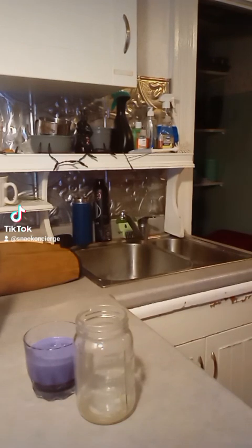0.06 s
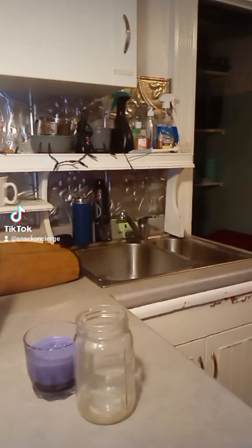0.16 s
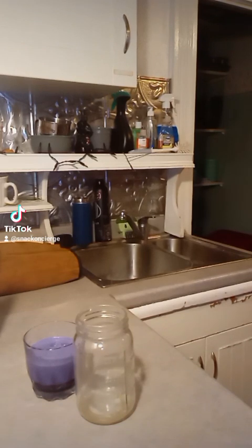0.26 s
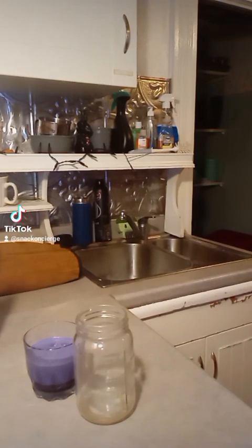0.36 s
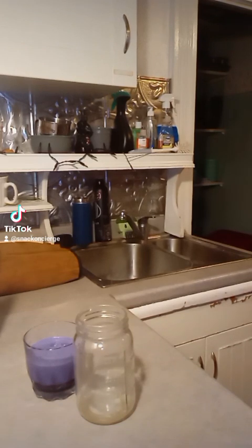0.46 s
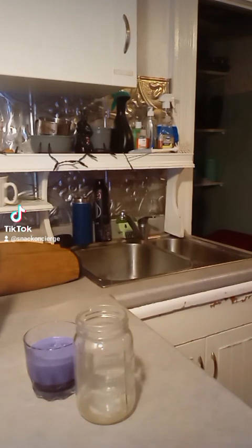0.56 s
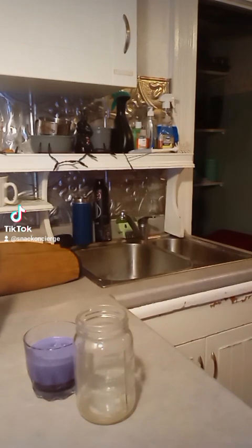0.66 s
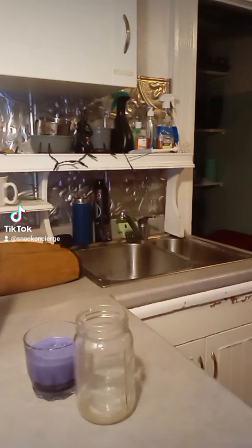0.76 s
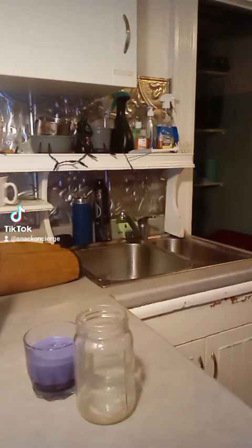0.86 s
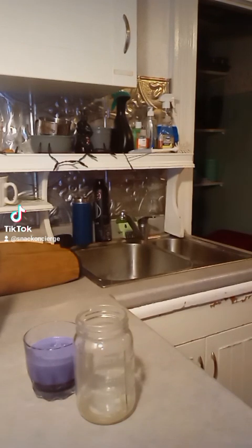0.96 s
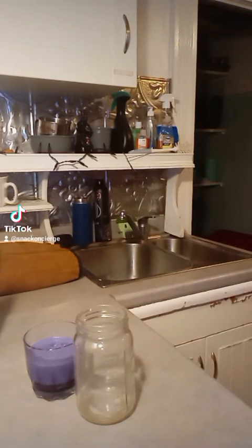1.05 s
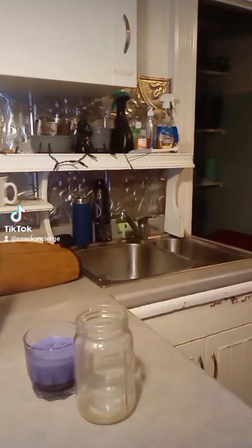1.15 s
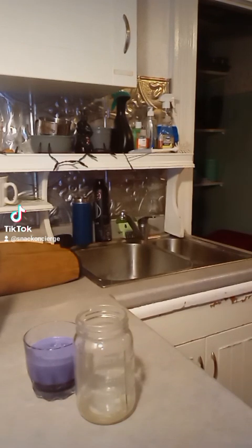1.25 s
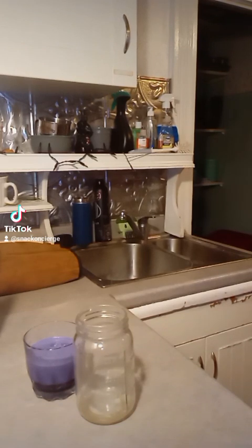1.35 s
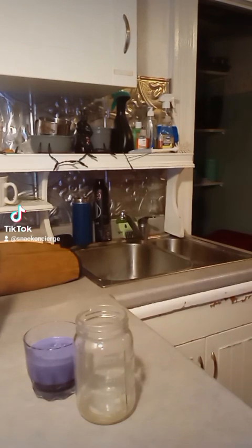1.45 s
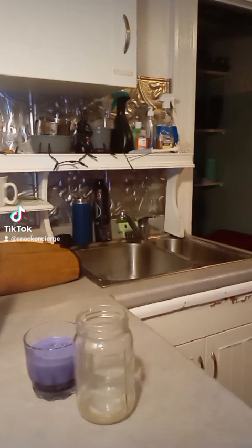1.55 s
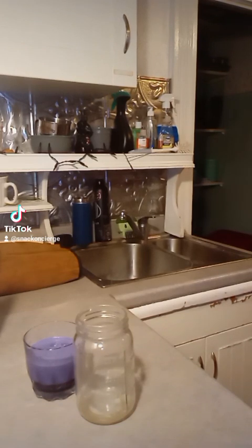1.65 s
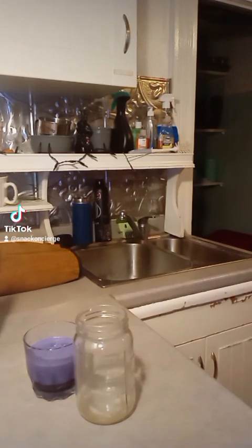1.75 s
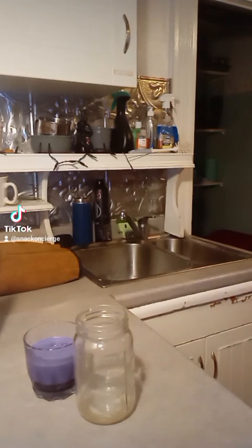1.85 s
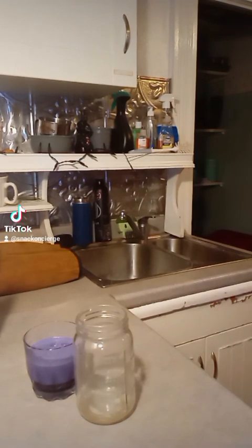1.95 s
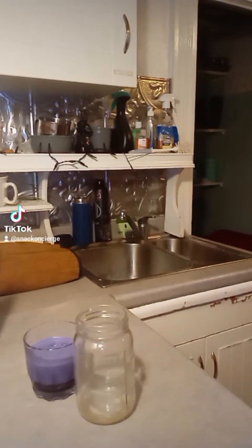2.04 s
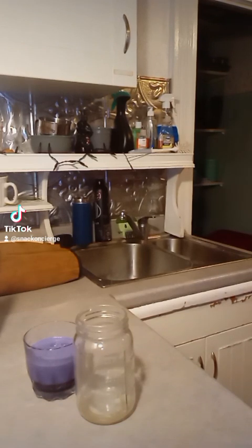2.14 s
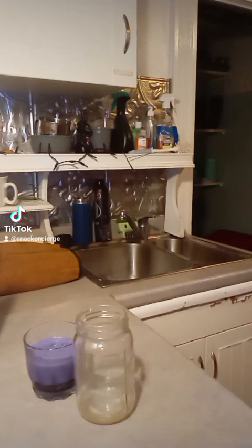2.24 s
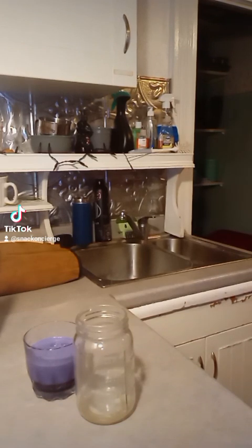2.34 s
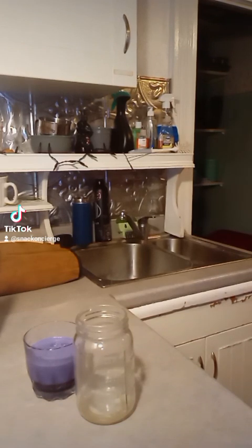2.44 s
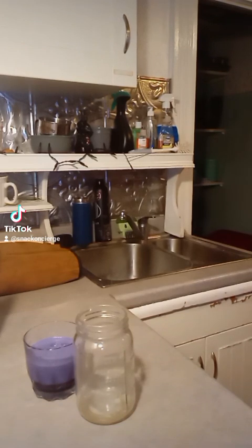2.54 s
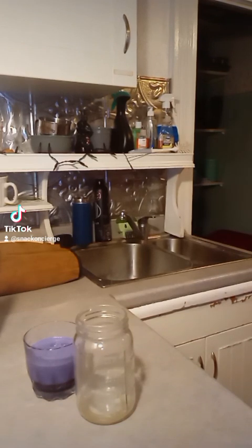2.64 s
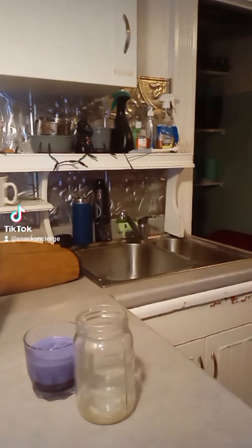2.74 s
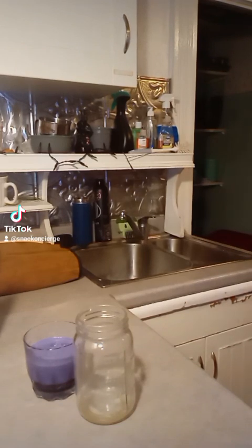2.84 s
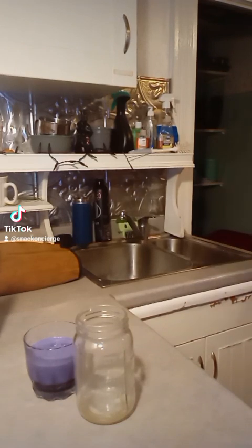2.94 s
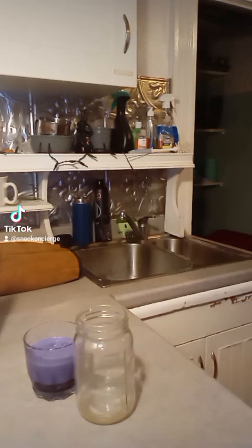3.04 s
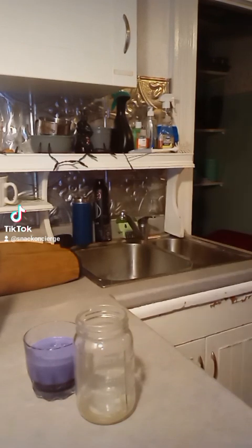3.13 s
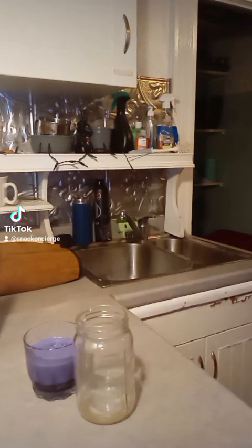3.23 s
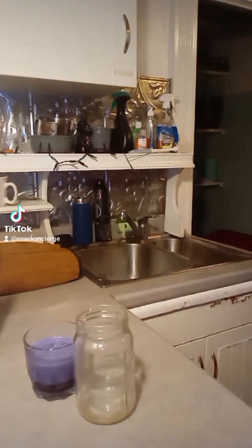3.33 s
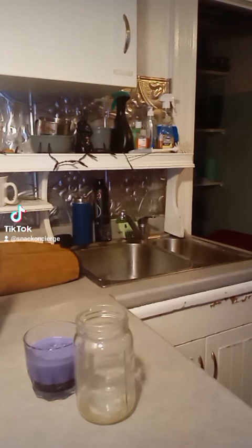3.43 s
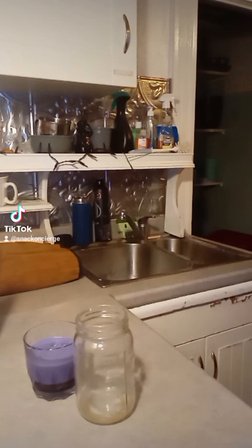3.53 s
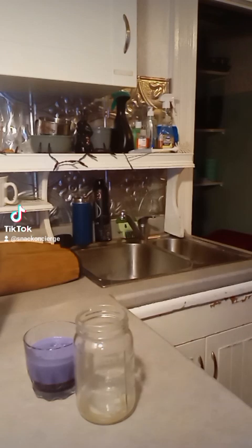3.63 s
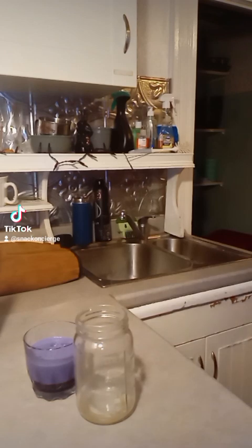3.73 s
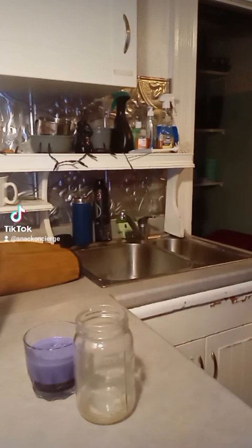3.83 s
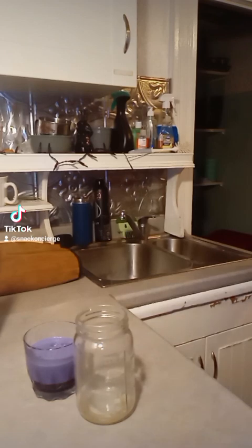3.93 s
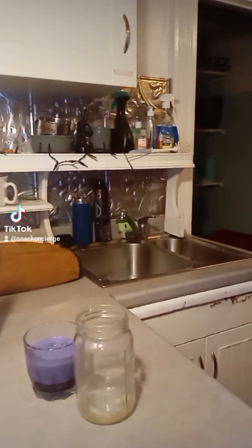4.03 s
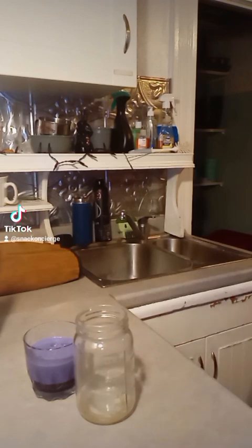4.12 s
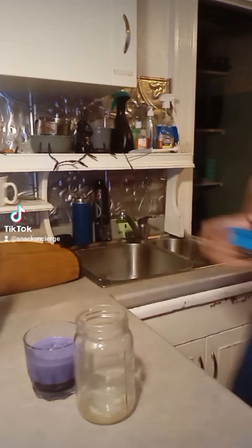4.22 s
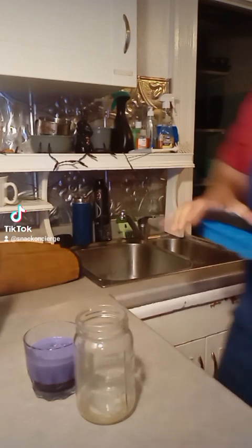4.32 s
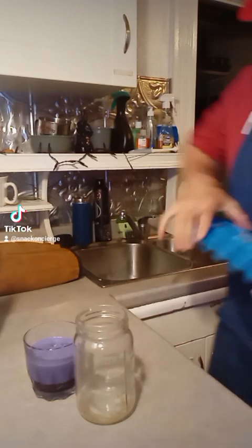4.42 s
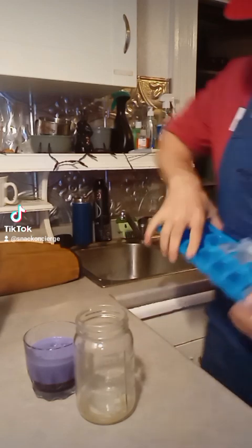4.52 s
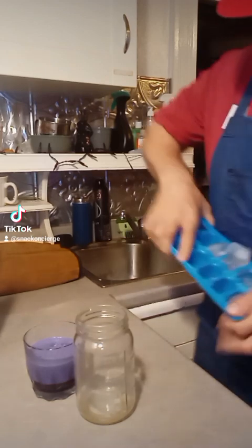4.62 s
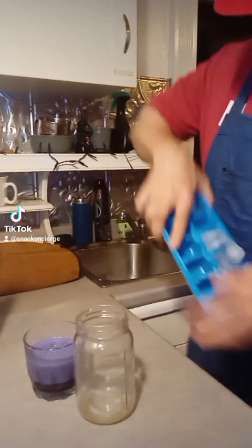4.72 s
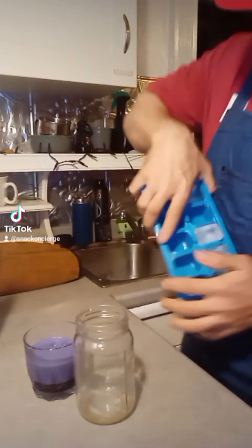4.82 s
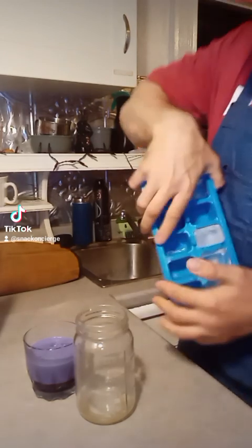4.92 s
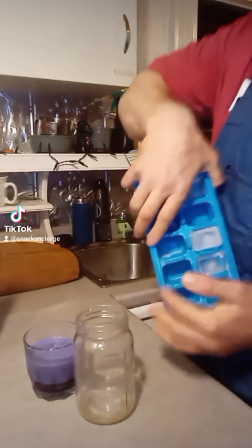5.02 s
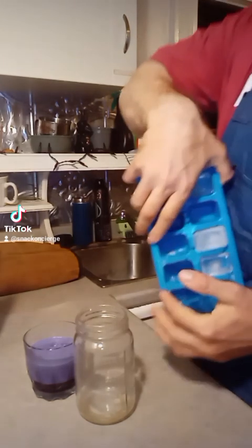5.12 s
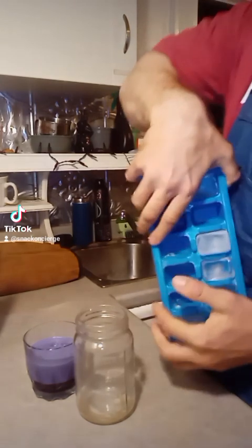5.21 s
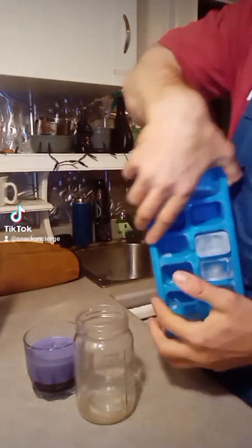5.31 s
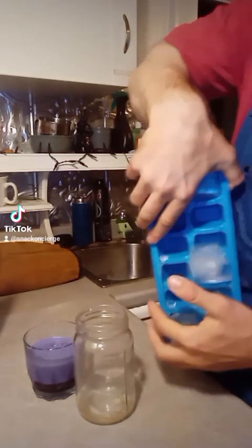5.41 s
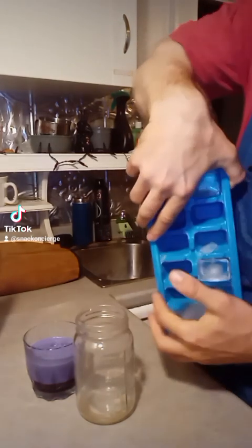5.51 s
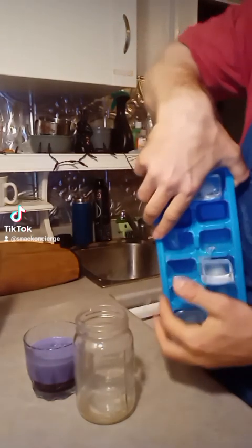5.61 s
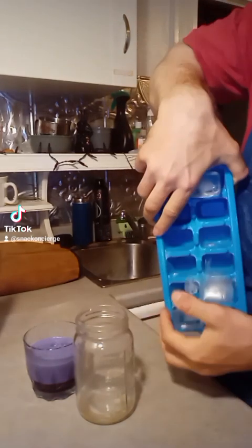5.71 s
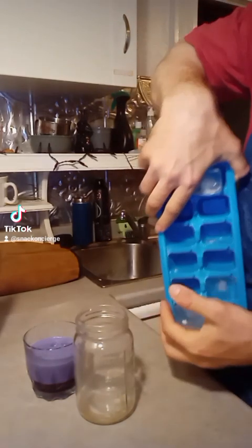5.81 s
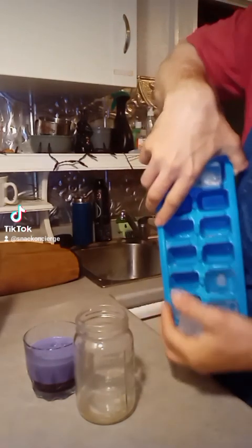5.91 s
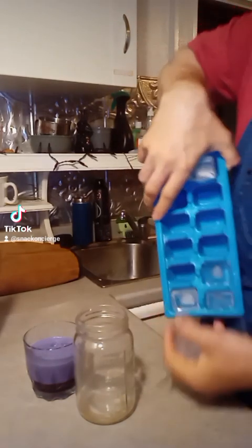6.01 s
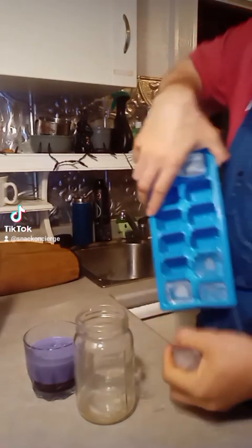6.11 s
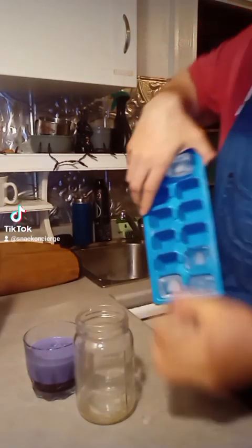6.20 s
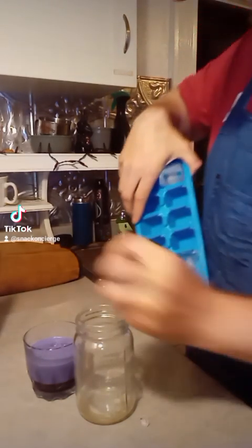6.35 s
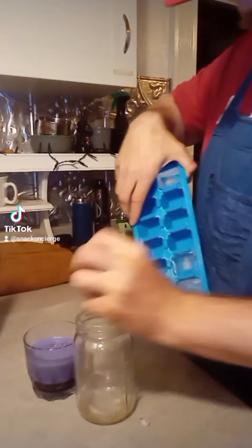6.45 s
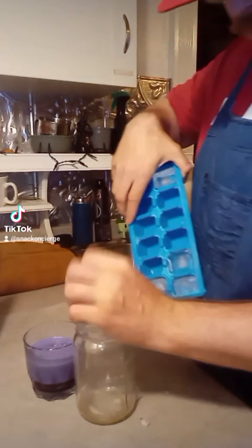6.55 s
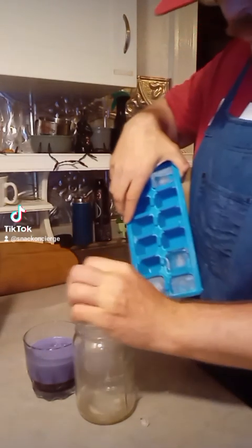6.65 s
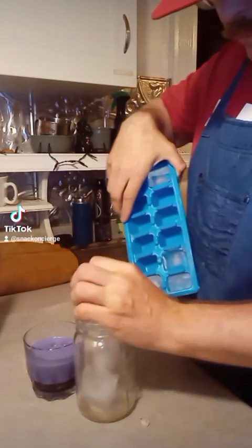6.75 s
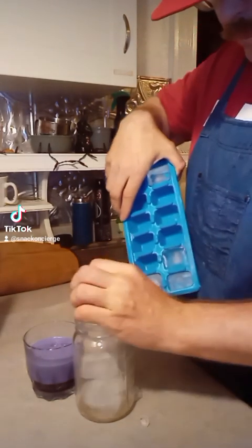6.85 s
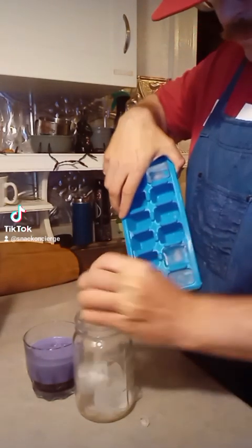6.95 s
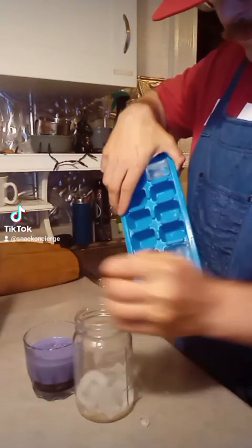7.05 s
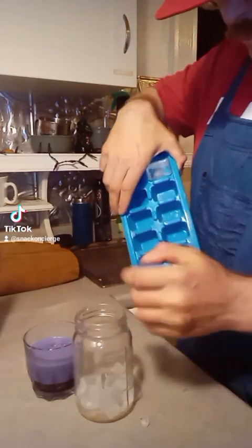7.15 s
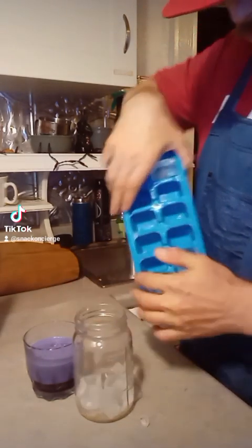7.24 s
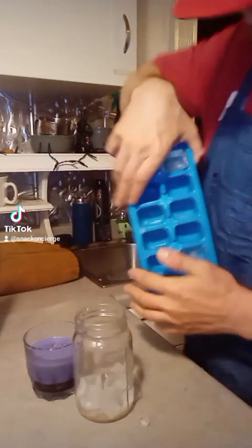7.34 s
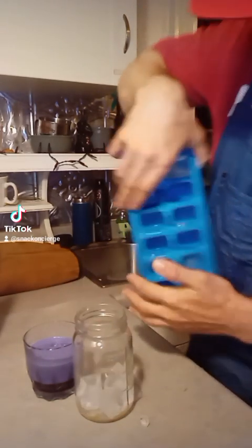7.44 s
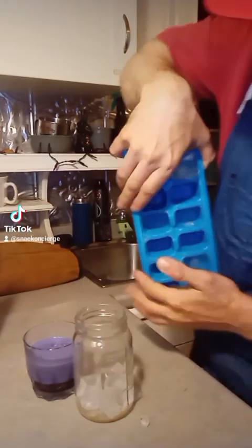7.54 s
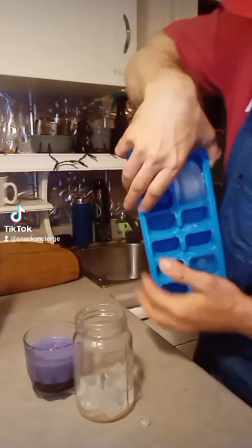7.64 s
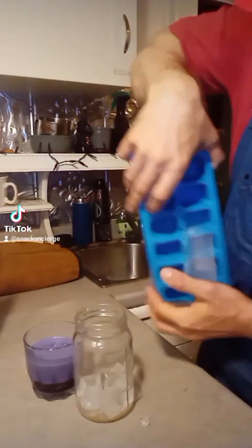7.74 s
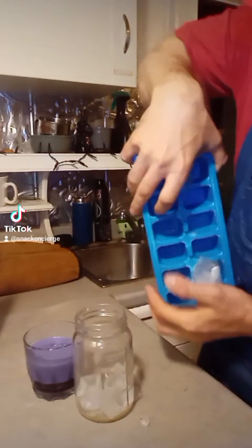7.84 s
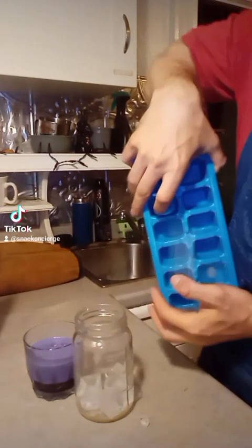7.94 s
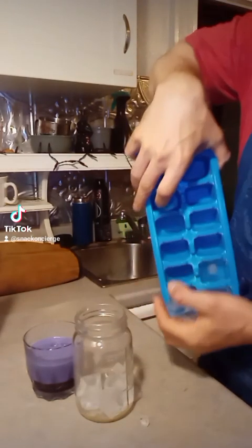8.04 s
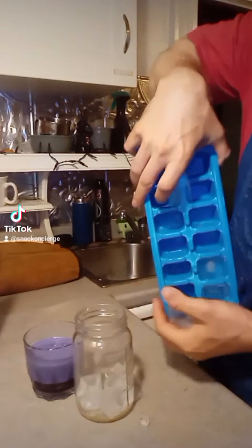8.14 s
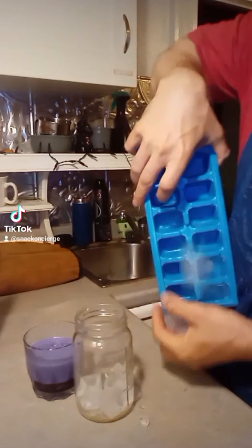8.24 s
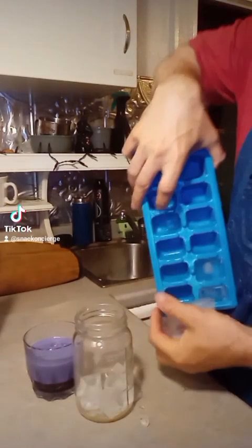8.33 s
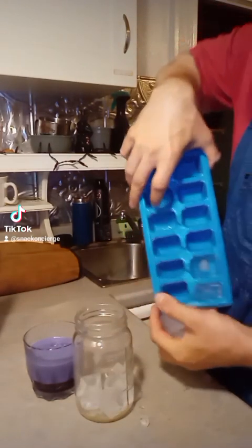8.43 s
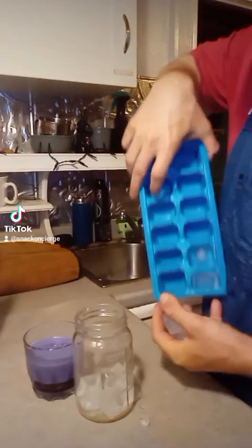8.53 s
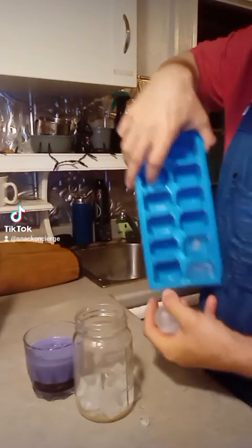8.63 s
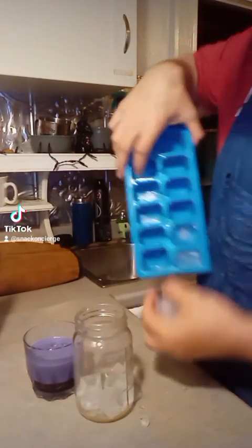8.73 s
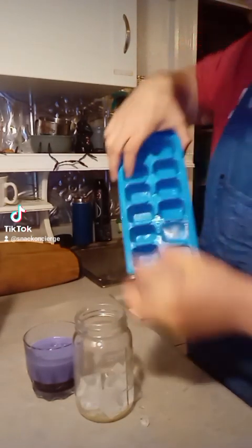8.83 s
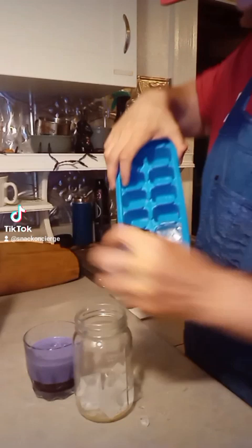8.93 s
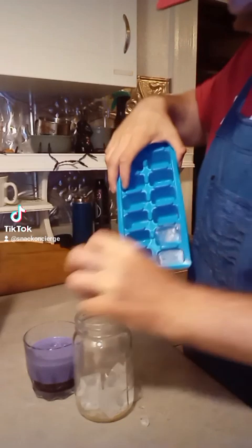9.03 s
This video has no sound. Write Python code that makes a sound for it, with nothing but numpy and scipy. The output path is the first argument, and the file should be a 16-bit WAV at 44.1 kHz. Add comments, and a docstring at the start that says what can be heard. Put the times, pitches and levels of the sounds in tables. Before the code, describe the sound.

A small kitchen with a faint low hush. Off to the side a freezer seal puffs open and someone rummages, with hollow plastic knocks, scrapes and a thump. Close by, a plastic ice tray is twisted, creaking and snapping. A handful of cubes tumbles into a glass jar with clacks and bright clinks on the counter; then the tray is twisted again and loose cubes knock. Two close, unlike microphones, left loud and dull, right fainter and bright.

```python
"""In a small kitchen, over a low hush of coloured noise, someone rummages in the freezer: stick-slip grains
rustle, knocks ring plastic resonances and the door seal puffs with filtered noise. Then a plastic ice tray
is twisted until grains creak and short bursts snap. A handful of cubes drops into a glass jar on the counter,
each blow clacking and ringing modes of glass and counter; the tray is twisted again and cubes knock in it.
Two unlike microphones stand close to the jar."""
import sys
import numpy as np
from scipy import signal
from scipy.fft import rfft, irfft, next_fast_len
from scipy.io import wavfile
from scipy.ndimage import uniform_filter1d

SR = 44100
rng = np.random.default_rng(int(sys.argv[2]) if len(sys.argv) > 2 else 0)


def digitize_waveform(pressure):
    """Quantize a signal to 16-bit integers and store it at the path in sys.argv[1].

    Rows of a 2-D input are taken as channels; values are limited to [-1, 1].
    """
    field = np.atleast_2d(pressure).T
    bounded = np.clip(field, -1, 1)
    quanta = np.round(bounded * 32767).astype(np.int16)
    wavfile.write(sys.argv[1], SR, quanta)


N = 399987
TIME = np.arange(N) / SR  # seconds

# All levels in the tables are relative: each layer has its own gain further on.
# Colour of the still room. Each row: frequency in Hz, density in dB per Hz.
HUSH_COLOUR = [(18, -46.5), (30, -1), (134, -6), (199, 9), (273, -7), (364, -6), (569, -6), (866, -8),
               (1010, -12.5), (3870, -29), (6210, -31), (13300, -41.5), (16000, -42.5)]
HUSH_DB = -62.5  # rms level ahead of the microphones
# Kitchen reverberation. Each row: frequency in Hz, decay time t60 in seconds.
KITCHEN_T60 = [(120, 0.31), (500, 0.14), (2000, 0.37), (6000, 0.27), (14000, 0.25)]
ALIKE_HZ = 404  # well below this both microphones hear nearly the same room
# The freezer door peels off its seal in hollow puffs. Each row: start in seconds, length in seconds, level in dB.
DOOR_PUFFS = [(0.342, 0.065, -44), (0.475, 0.11, -40), (0.555, 0.038, -37.5)]
# Colour of the air at the seal. Each row: frequency in Hz, density in dB per Hz.
DOOR_COLOUR = [(70, -17), (155, 4.5), (321, 5), (362, 10), (534, 2), (643, -4.5), (949, -9), (1160, -15),
               (1870, -8), (2580, -23), (4000, -33), (5200, -88)]
# Things pushed and dragged in the freezer. Each row: start in seconds, length in seconds,
# scrape in dB, crinkle in dB, bump in dB, scrape resonance in Hz.
FREEZER_STROKES = [(0.07, 0.2, -51, -60, -59, 1400), (0.2, 0.011, -29, -35, -69, 1410),
                   (0.225, 0.05, -32, -44.5, -37, 1320), (0.3, 0.081, -43.5, -46, -51, 2040),
                   (0.56, 0.047, -62, -51, -72, 1990), (1.258, 0.015, -57, -58, -41, 1330),
                   (1.45, 0.43, -60, -64.5, -95, 2130), (1.82, 0.13, -45, -56.5, -70, 1800),
                   (1.53, 0.12, -41, -45, -80, 2300), (1.58, 0.011, -31, -33, -53, 1810),
                   (1.87, 0.13, -32.5, -34.5, -80, 1540), (1.925, 0.14, -32.5, -32.5, -31, 1450),
                   (2.105, 0.22, -32, -40, -33, 1470), (2.28, 0.056, -36, -30, -43, 1460),
                   (2.34, 0.11, -35, -41, -45, 1340), (2.615, 0.1, -32.5, -31, -35.5, 1090),
                   (2.77, 0.086, -44, -34, -83, 1870), (2.93, 0.054, -41.5, -37, -67.5, 1690),
                   (3.19, 0.21, -45.5, -41, -88, 3180), (3.675, 0.057, -39.5, -33.5, -43, 1720),
                   (3.8, 0.2, -52.5, -44, -78, 2460)]
# Plastic and frozen things knocking in the freezer. Each row: start in seconds, knock in dB,
# resonance in Hz, crack in dB.
FREEZER_KNOCKS = [(0.228, -16, 1410, -56), (1.259, -31.5, 1640, -68), (1.261, -36.5, 3400, -66),
                  (1.872, -17.5, 1530, -38), (1.921, -16, 1360, -31), (1.96, -12, 1440, -32.5),
                  (2.11, -12.5, 1900, -55), (2.128, -20, 1830, -60), (2.16, -22.5, 1930, -55),
                  (2.218, -18, 2350, -67), (2.258, -20.5, 1400, -60), (2.345, -15.5, 730, -32.5),
                  (2.428, -18, 1730, -45.5), (2.496, -25, 790, -52), (2.62, -12.5, 800, -32),
                  (2.971, -26.5, 1850, -37), (3.084, -35, 3360, -35.5), (3.132, -35, 3920, -33.5),
                  (3.189, -24.5, 3400, -30), (3.304, -12.5, 1394, -37.5), (3.683, -36, 1470, -42),
                  (3.899, -42, 3180, -41.5), (3.971, -44, 2960, -37.5), (4.109, -35.5, 2100, -44.5),
                  (4.179, -34, 3040, -40)]
# Plastic judders along a shelf and sings; the rows from 0.36 s to 0.75 s are the freezer door ringing as it
# opens. # Each row: start in seconds, length in seconds, level in dB, resonance in Hz, width in Hz of the first
# of two resonators.
JUDDERS = [(0.129, 0.14, -47, 776, 110), (0.361, 0.033, -43, 373, 45),
           (0.536, 0.094, -47.5, 1900, 400), (0.64, 0.057, -65.5, 2000, 347),
           (0.668, 0.081, -49.5, 300, 60), (1.858, 0.019, -51, 1570, 170),
           (2.104, 0.064, -29, 2000, 300), (2.17, 0.076, -30.5, 2060, 380),
           (2.342, 0.082, -26, 718, 101), (2.44, 0.078, -27.5, 750, 130),
           (2.424, 0.11, -36.5, 1900, 240), (3.3, 0.037, -25, 1030, 133)]
# Soft heavy thumps of the freezer cabinet. Each row: start in seconds, level in dB.
FREEZER_THUMPS = [(1.03, -45), (1.28, -45), (1.806, -48.5), (2.075, -22), (2.095, -16.5), (3.534, -53),
                  (5.314, -52)]
# Hollow boom of the freezer's shelves. Each row: frequency in Hz, density in dB per Hz.
SHELF_BOOM = [(60, -20), (160, -13), (250, -10), (380, 2.5), (540, 3.5), (720, 10), (1000, 8.5),
              (2000, -36)]
# Deep boom of the freezer cabinet. Each row: frequency in Hz, density in dB per Hz.
CABINET_BOOM = [(25, -7.5), (60, -19), (110, -20), (168, 2), (215, -14.5), (290, -32.5), (600, -29.5),
                (2000, -69)]
# Scraped plastic. Each row: frequency in Hz, density in dB per Hz.
SCRAPE_COLOUR = [(250, -29), (500, -15.5), (720, -7.5), (1400, 6), (2200, 2.5), (2600, 3), (3300, -5),
                 (4000, 2.5), (4700, -15), (8000, -61)]
# Cracking frost. Each row: frequency in Hz, density in dB per Hz.
CRACK_COLOUR = [(1000, -16), (2400, -8.5), (3500, 2), (5500, 0.5), (8200, -1), (10000, -6.5), (13500, -20),
                (16000, -15)]
# A fresh fracture of ice, brighter than frost. Each row: frequency in Hz, density in dB per Hz.
SNAP_COLOUR = [(1000, -28.5), (2400, 2), (3500, 7), (5500, 1.5), (8200, 3), (10000, -4.5), (13500, -15.5),
               (16000, -18.5)]
# Twists of the tray. Each row: start in seconds, length in seconds, scrape in dB, crinkle in dB,
# bump in dB, scrape resonance in Hz.
TRAY_TWISTS = [(4.43, 0.15, -34, -36.5, -52, 2900), (4.495, 0.071, -42, -40, -44, 2170),
               (4.6, 0.12, -50, -43, -77, 2410), (4.695, 0.068, -28, -34, -47, 2760),
               (4.865, 0.04, -30.5, -35, -45, 1480), (4.91, 0.072, -32.5, -60, -36.5, 1030),
               (5.0, 0.055, -37, -54, -52, 1400), (5.075, 0.065, -36, -35.5, -42.5, 1470),
               (5.17, 0.036, -40, -32, -41, 1610), (5.31, 0.13, -36.5, -38.5, -53.5, 1700),
               (5.42, 0.038, -23, -28, -33.5, 1450), (5.56, 0.12, -45, -42.5, -41.5, 1200),
               (5.68, 0.13, -65, -43, -75, 1330), (5.92, 0.24, -50, -60.5, -79, 2160),
               (6.11, 0.1, -41.5, -45, -90, 3000), (6.39, 0.085, -34, -36.5, -77, 2610),
               (7.38, 0.11, -28, -48, -39.5, 1210), (7.53, 0.12, -35, -65, -33, 1510),
               (7.87, 0.079, -36, -58.5, -32.5, 2080), (8.03, 0.095, -27.5, -43.5, -31.5, 1480),
               (8.265, 0.066, -48, -37, -34.5, 1370), (8.36, 0.12, -25.5, -49, -53, 1870),
               (8.52, 0.73, -55, -60.5, -81, 1830)]
# The tray snaps and cubes knock in their pockets. Each row: start in seconds, knock in dB,
# resonance in Hz, crack in dB.
TRAY_SNAPS = [(4.387, -38, 2820, -50), (4.446, -34, 1570, -30), (4.473, -31, 1660, -33),
              (4.507, -23, 1010, -29), (4.537, -27, 1970, -28.5), (4.625, -48, 2800, -34.5),
              (4.703, -27, 2920, -36), (4.886, -37, 1180, -47), (4.913, -22.5, 790, -30),
              (4.939, -21.5, 1070, -34.5), (4.955, -18.5, 1330, -56), (4.974, -25.5, 930, -56),
              (4.996, -19.5, 1040, -49), (5.033, -21, 1330, -38.5), (5.084, -22, 1570, -33),
              (5.153, -29, 1200, -35), (5.182, -21, 1765, -48), (5.222, -23, 1255, -32),
              (5.421, -20, 1270, -32.5), (5.518, -18, 1468, -27.5), (5.591, -15, 1126, -35),
              (5.639, -14.5, 1243, -53), (5.71, -21.5, 1230, -54), (5.739, -78, 3250, -28),
              (5.797, -18, 1250, -37), (5.834, -33, 1270, -37), (5.822, -19.5, 1340, -29.5),
              (5.854, -49, 1350, -24.5), (5.9, -47, 2470, -52), (6.108, -62, 2780, -28.5),
              (6.224, -44, 2900, -33), (6.384, -38.5, 2220, -46), (7.201, -27, 1817, -31),
              (7.357, -34.5, 1290, -36.5), (7.398, -27.5, 1640, -34), (7.416, -26, 1620, -37),
              (7.44, -26, 1160, -30), (7.529, -17.5, 2247, -33.5), (7.578, -19, 1670, -55),
              (7.598, -22, 1170, -41), (7.641, -23, 1280, -41.5), (7.685, -26.5, 1770, -50),
              (7.781, -19, 1280, -49.5), (7.867, -14, 2174, -32), (7.899, -16.5, 2300, -57),
              (7.91, -15.5, 1290, -35), (7.972, -18, 945, -49), (7.993, -14.5, 900, -39.5),
              (8.034, -12.5, 1670, -32.5), (8.052, -42, 2540, -33), (8.114, -14.5, 1350, -44),
              (8.236, -16, 1770, -55), (8.246, -40, 1770, -67), (8.267, -18, 1276, -29),
              (8.333, -25, 1540, -44), (8.361, -11.5, 1600, -30.5), (8.405, -21, 1570, -60)]
# The tray buckles with a dull thud. Each row: start in seconds, level in dB.
TRAY_THUDS = [(4.51, -39), (4.913, -33), (5.084, -29.5), (5.64, -37), (5.421, -34), (5.569, -32),
              (7.529, -37), (7.867, -33.5), (8.235, -37), (8.267, -25.5)]
# Dull flexing of the tray. Each row: frequency in Hz, density in dB per Hz.
TRAY_FLEX = [(25, -45), (60, -13), (110, -1.5), (160, 11), (205, -18.5), (280, 5), (380, -2.5), (520, 7.5),
             (750, 9), (1100, -10.5), (2000, -64)]
# Cubes striking the jar. Each row: start in seconds, thump of the counter in dB, clack in dB,
# jostling of the heap in dB, then the ring of the glass in dB near 3 kHz, near 4.6 kHz, near 5.1 kHz,
# near 5.4 kHz and above 6 kHz.
JAR_HITS = [(6.577, -12, -15.5, -23.5, -29, -49, -52, -24.5, -35),
            (6.662, -32, -39, -53, -16, -33, -50, -18.5, -28.5),
            (6.696, -11.5, -36, -60, -53, -37, -52, -46.5, -39.5),
            (6.732, -17.5, -11.5, -17, -46, -32, -27, -25, -19),
            (6.741, -37, -41, -21, -29, -30, -14, -29, -25.5),
            (6.781, -29, -30, -21, -43, -40, -26, -24, -31),
            (6.796, -36, -33, -32, -39, -22, -18, -32, -33),
            (6.808, -15.5, -14.5, -28, -22, -28, -42, -33, -27),
            (6.828, -22, -24, -36, -33, -32, -39, -32, -26),
            (6.845, -13, -13, -17.5, -42, -38, -40, -23, -24),
            (6.876, -25, -17, -16.5, -28, -25, -29, -41, -24),
            (6.903, -25.5, -20, -22, -22.5, -27, -34, -39, -32),
            (6.934, -28, -20.5, -17, -20.5, -29, -39, -37, -34),
            (6.973, -30, -22, -40, -25, -27, -41, -36, -37),
            (6.989, -12, -17, -18.5, -42, -28, -56, -33, -30),
            (7.06, -15.5, -12.5, -12, -29.5, -24, -28, -26, -30),
            (7.129, -19.5, -18, -23, -34, -25.5, -35, -40, -37),
            (7.199, -34, -33, -60, -44, -39, -43, -29, -34.5),
            (7.229, -37, -57, -60, -36, -43, -57, -52, -63)]
# Modes of the glass jar, split into pairs by the moulded wall. Each row: frequency in Hz, strength in dB.
GLASS_MODES = [(2973, -40), (4533, -51), (4613, -48), (5087, -40), (5110, -51.5), (5280, -57.5),
               (5381, -39.5), (5491, -54), (6843, -54.5), (8981, -47.5), (9032, -62), (9093, -56.5),
               (9841, -60.5), (10275, -54.5), (11289, -63.5)]
# Modes of the counter under the jar. Each row: frequency in Hz, strength in dB.
COUNTER_MODES = [(122, 6.5), (161, 8.5), (237, 3.5), (272, 1), (300, 3), (405, -12.5), (442, -6), (471, -9),
                 (511, -5), (613, -21), (711, -13), (786, -14), (1010, -18), (1790, -9)]
# Ice landing in the jar. Each row: frequency in Hz, density in dB per Hz.
CLACK_COLOUR = [(50, -23), (150, -15), (400, 5), (750, 4.5), (1150, -0.5), (1350, -7.5), (1700, -0.5),
                (2300, -12.5), (4000, -11), (6500, -49), (9000, -34)]
# Ice jostling in the jar. Each row: frequency in Hz, density in dB per Hz.
JOSTLE_COLOUR = [(200, 7), (700, 12.5), (1050, -10.5), (1350, -2), (1750, -2.5), (2300, -3), (3800, -25),
                 (5250, 9.5), (6100, -9), (7000, -1), (8000, -18), (9100, -11), (11000, -30), (16000, -39)]
# The left microphone, loud and dull. Each row: frequency in Hz, gain in dB.
LEFT_MIC = [(50, -2), (300, 2), (900, 1), (2700, 5.5), (4200, 0), (6400, -1), (7400, -13.5), (8600, -37.5),
            (13500, -25), (15400, -21)]
# The right microphone, faint and bright. Each row: frequency in Hz, gain in dB.
RIGHT_MIC = [(50, -11), (300, -7), (900, -7.5), (2700, -5.5), (4200, -2), (6400, 4.5), (8000, 5.5),
             (13800, 1), (15200, 14.5), (16000, 7)]
LEFT_LAG = 39  # samples
CUTOFF_HZ = 16200


def from_db(db):
    """Turn decibels into an amplitude factor."""
    return 10 ** (np.asarray(db) / 20)


def rms_one(x):
    """Scale a sound to rms 1."""
    return x / np.sqrt(np.mean(x ** 2) + 1e-20)


def peak_one(x):
    """Scale a blow so that its loudest 4 ms have rms 1."""
    return x / np.sqrt(uniform_filter1d(x ** 2, size=176).max())


def at_hz(points, hz):
    """Read a curve on a log-frequency axis."""
    f, value = np.transpose(points)
    return np.interp(np.log(np.maximum(hz, 1)), np.log(f), value)


def add(out, s, sound):
    """Mix a sound in at time s."""
    i = max(round(s * SR), 0)
    out[i:i + len(sound)] += sound[:max(N - i, 0)]


def tint(x, spectrum):
    """Causal (minimum-phase) filter with the given spectrum, built by folding its cepstrum."""
    size = 2 * next_fast_len(len(x) // 2 + 4096)
    hz = np.arange(size // 2 + 1) * SR / size
    cepstrum = irfft(np.log(from_db(at_hz(spectrum, hz))))
    cepstrum[1:size // 2] *= 2
    cepstrum[size // 2 + 1:] = 0
    return irfft(rfft(x, size) * np.exp(rfft(cepstrum)))[:len(x)]


def high_pass(x, hz):
    """A small body radiates little below hz."""
    return signal.sosfilt(signal.butter(2, hz, "high", fs=SR, output="sos"), x)


def band_pass(x, order, low_hz, high_hz):
    """Keep what lies between two frequencies."""
    sos = signal.butter(order, [low_hz, high_hz], "band", fs=SR, output="sos")
    return signal.sosfilt(sos, x)


def resonate(x, hz, width_hz):
    """One resonance with gain 1 on top."""
    r = np.exp(-np.pi * width_hz / SR)
    zeros = np.array([1, 0, -1]) * (1 - r * r) / 2
    return signal.lfilter(zeros, [1, -2 * r * np.cos(2 * np.pi * hz / SR), r * r], x)


def ring(clicks, hz, t60):
    """A unit click sets a decaying sine of starting height 1 ringing."""
    r, w = np.exp(-np.log(1000) / (t60 * SR)), 2 * np.pi * hz / SR
    return signal.lfilter([0, np.sin(w)], [1, -2 * r * np.cos(w), r * r], clicks + 1e-18)


def drift(rate):
    """A slow random wander through `rate` normal draws a second."""
    count = int(rate * N / SR) + 2
    return np.interp(TIME * rate, np.arange(count), rng.standard_normal(count))


def burst(decay_s, size=4096):
    """A contact: many overlapping vibrations that die together."""
    return rng.standard_normal(size) * np.exp(-TIME[:size] / decay_s)


def grains(per_s, spread_db):
    """Tiny slips at random moments, with sizes spread over spread_db steps; rms 1."""
    sizes = from_db(spread_db * np.minimum(rng.exponential(1, N), 4))
    sizes = sizes * rng.choice([-1, 1], N)
    return rms_one(sizes * (rng.random(N) < per_s / SR))


def swell(length, attack_s, sag_db_per_s, release_s):
    """One push: it builds up, slackens (or grows, if the sag is negative), then dies away."""
    t = TIME[:SR]
    attack = np.minimum(t / attack_s, 1)
    sag = from_db(-sag_db_per_s * np.minimum(t, length))
    return attack * sag * np.exp(-np.clip((t - length) / release_s, 0, 20))


def strokes(rows, attack_s, sag_db_per_s, release_s):
    """Gains of scrape, crinkle and bump, and the scrape resonance, weighted to the loudest stroke."""
    power, centre = np.full((3, N), 1e-20), np.full(N, 1e-17)
    for start, length, *levels_db, hz in rows:
        push = np.outer(from_db(levels_db), swell(length, attack_s, sag_db_per_s, release_s)) ** 2
        for layer, part in zip(power, push):
            add(layer, start, part)
        add(centre, start, push[0] * hz)
    return *np.sqrt(power), centre / power[0]


def reflections(x, decay_s=0.0073, size=8192):
    """A spray of echoes off nearby surfaces; it keeps changing as the hands move."""
    hop, taps = size // 2, 1024
    x = np.pad(x, ((0, 0), (hop, size)))
    window = np.sin(np.pi * np.arange(size) / size)  # overlapping frames keep the power steady
    out = np.zeros((2, x.shape[1] + taps))
    for i in range(0, N + hop, hop):
        spray = np.array([rms_one(burst(decay_s, size=taps)) for side in "LR"]) / np.sqrt(taps)
        out[:, i:i + size + taps - 1] += signal.fftconvolve(x[:, i:i + size] * window, spray, axes=1)
    return high_pass(out[:, hop:hop + N], ALIKE_HZ)


def kitchen(x, wet_db, build_s, near_db=None):
    """Direct sound, a tail that builds up and dies band by band, and near reflections if asked for."""
    t, edges, tail = TIME[:SR // 2], np.geomspace(60, 18000, 9), 0
    for low, high in zip(edges, edges[1:]):
        hz = np.sqrt(low * high)
        mid, side = band_pass(rng.standard_normal((2, len(t))), 2, low, high)
        alike = 1 / (1 + (hz / ALIKE_HZ) ** 2)
        noise = np.sqrt(1 + alike) * mid + np.sqrt(1 - alike) * side * [[1], [-1]]
        decay = np.exp(-np.log(1000) * t / at_hz(KITCHEN_T60, hz))
        tail = tail + noise * decay * (1 - np.exp(-t / build_s))
    response = from_db(wet_db) * tail / np.sqrt(np.sum(tail ** 2, axis=1, keepdims=True))
    response[:, 0] += 1  # direct sound
    x = np.atleast_2d(x)
    out = signal.fftconvolve(x, response, axes=1)[:, :N]
    power = 1 + from_db(wet_db) ** 2
    if near_db is not None:
        out = out + from_db(near_db) * reflections(x)
        power = power + from_db(near_db) ** 2
    return out / np.sqrt(power)


def friction(motion, boom, per_s, spread_db, focus_db, scrape_db, wall_db, crinkle_db, bump_db):
    """Stick-slip grains sound a wandering plastic resonance, a frosty crinkle and the dull body beneath."""
    scrape, crinkle, bump, centre_hz = motion
    slips = grains(per_s, spread_db)
    rub, body, power = tint(slips, SCRAPE_COLOUR), 0, 0
    for k, hz in enumerate(np.geomspace(700, 3100, 10)):
        nearness = np.exp(-(np.log2(hz / centre_hz) / .35) ** 2)
        weight = from_db(focus_db * nearness + 3 * drift(20))
        mode = resonate(rub, hz, 0.18 * hz) * (-1) ** k
        body = body + weight * mode
        power = power + weight ** 2 * np.mean(mode ** 2)
    # flakes of frost and film differ in size, so the crinkle keeps changing colour
    flakes = 0
    for hz in np.geomspace(3200, 14000, 6):
        flake = resonate(grains(per_s / 3, spread_db), hz, .3 * hz)
        flakes = flakes + flake * from_db(2.5 * drift(14)) / np.sqrt(hz)
    rubbing = from_db(scrape_db) * body / np.sqrt(power)
    rubbing += from_db(wall_db) * rms_one(resonate(rub, 724, 57))  # the rubbed wall drones along
    dull = from_db(bump_db) * rms_one(tint(grains(per_s, spread_db), boom))
    frost = from_db(crinkle_db) * rms_one(tint(rms_one(flakes) + 0.47 * slips, CRACK_COLOUR))
    return scrape * rubbing + bump * dull + crinkle * frost


def knock(centre_hz, ring_s, spread, broad, count=28):
    """A blow rings the pocket it lands in most, and a fainter scatter of modes of ice and plastic."""
    t = TIME[:4096]
    scattered_hz = 600 * 7.5 ** ((np.arange(count) + rng.random(count)) / count)
    hz = np.append(centre_hz, scattered_hz)
    near = np.exp(-(np.log2(hz / centre_hz) / spread) ** 2)  # spread in octaves
    scatter = from_db(at_hz(SCRAPE_COLOUR, hz) + 2.07 * rng.standard_normal(count + 1))
    phase = rng.uniform(0, 2 * np.pi, (count + 1, 1))
    decay = np.exp(-t * np.sqrt(hz[:, None] / centre_hz) / ring_s)  # high modes die sooner
    modes = np.sin(2 * np.pi * hz[:, None] * t + phase) * decay
    onset = 1 - np.exp(-t / 0.00039)  # soft plastic takes a moment to ring up
    return peak_one((near + broad * scatter) @ modes * onset)


def knocks(rows, ring_s, crack_s, spread, broad, knock_db, crack_db, rebound_s, rebound_db):
    """Each blow is a sharp crack and the hollow ring of plastic, followed at once by a weaker rebound."""
    out = np.zeros(N)
    for s, level, hz, crack in rows:
        gain = from_db(level + knock_db)
        add(out, s, gain * knock(hz, ring_s, spread, broad))
        again_s = s + rebound_s * rng.uniform(.7, 1.3)
        again_hz = hz * rng.uniform(0.66, 1.3)
        add(out, again_s, gain * from_db(rebound_db) * knock(again_hz, ring_s, spread, broad))
        add(out, s, from_db(crack + crack_db) * peak_one(tint(burst(crack_s), SNAP_COLOUR)))
    return out


def thuds(rows, body, decay_s, gain_db):
    """Soft, heavy blows that sound only the dull body."""
    out = np.zeros(N)
    for s, db in rows:
        add(out, s, from_db(db + gain_db) * peak_one(tint(burst(decay_s), body)))
    return out


def struck(modes, times, level_db, t60, scatter_db, skew_s, detune):
    """Every blow rings the same modes; leaning cubes shift their strength and pitch a little each time."""
    hz, db = np.transpose(modes)
    share = from_db(db) / np.linalg.norm(from_db(db))
    t, out = TIME[:SR // 3], np.zeros((2, N))
    fade = np.exp(-np.log(1000) * t / t60) * (1 - np.exp(-t / 0.00037))  # the contact lasts a moment
    for s, level in zip(times, level_db):
        pitch, strength, sign, *skews = rng.standard_normal((5, len(hz)))
        heights = share * from_db(level + scatter_db * strength) * np.sign(sign)
        sines = np.sin(2 * np.pi * np.outer(hz * (1 + detune * pitch), t))
        waves = sines * fade * heights[:, None]
        for side, skew in zip(out, skews):  # each mode reaches the two sides at its own moment
            for wave, late in zip(waves, skew):
                add(side, s + skew_s * late, wave)
    return out


def hush():
    """The still kitchen: steady coloured noise."""
    air = rms_one(tint(rng.standard_normal(N), HUSH_COLOUR))
    return from_db(HUSH_DB) * kitchen(air, wet_db=2.0, build_s=0.0031)


def door():
    """Air rushes past the rubber seal as the freezer opens: noise swelling in puffs."""
    flow = np.zeros(N)
    for start, length, db in DOOR_PUFFS:
        puff = swell(length, attack_s=0.03, sag_db_per_s=-1, release_s=0.031)
        add(flow, start, from_db(db) * puff)
    rush = rms_one(tint(rng.standard_normal(N), DOOR_COLOUR)) * flow
    return kitchen(rush, wet_db=-10.0, build_s=0.0031, near_db=-2.5)


def judders(per_s, spread_db):
    """Rapid slips keep one resonance of the dragged plastic, or of the opening door, sounding."""
    out, slips = np.zeros(N), grains(per_s, spread_db)
    for start, length, db, hz, width in JUDDERS:
        push = swell(length, attack_s=0.012, sag_db_per_s=52.5, release_s=0.0087)
        drag = slips[int(start * SR):][:len(push)]
        tone = resonate(resonate(drag, hz, width), hz, 2 * width)
        add(out, start, from_db(db) * push * rms_one(tone))
    return out


def freezer():
    """Friction, knocks, juddering plastic and the ringing door across the room, with a few deep cabinet thumps."""
    motion = strokes(FREEZER_STROKES, attack_s=0.0057, sag_db_per_s=-5, release_s=0.03)
    out = friction(motion, SHELF_BOOM, per_s=1600, spread_db=6.0, focus_db=5.5, scrape_db=3.5,
                   wall_db=-22, crinkle_db=-4.0, bump_db=-0.5)
    out += knocks(FREEZER_KNOCKS, ring_s=0.0045, crack_s=0.0015, spread=0.36, broad=0.2, knock_db=-4.0,
                  crack_db=10.0, rebound_s=.008, rebound_db=-12.5)
    out += judders(per_s=760, spread_db=0.0)
    thumps = high_pass(thuds(FREEZER_THUMPS, CABINET_BOOM, decay_s=0.011, gain_db=1.5), 55)
    rummaging = kitchen(out, wet_db=9.0, build_s=0.011, near_db=10.5)
    return rummaging + kitchen(thumps, wet_db=-6.5, build_s=0.11)


def tray():
    """The twisted tray creaks by stick-slip and snaps as the cubes break free."""
    motion = strokes(TRAY_TWISTS, attack_s=0.032, sag_db_per_s=20.5, release_s=0.015)
    creak = friction(motion, TRAY_FLEX, per_s=260, spread_db=4.2, focus_db=6.0, scrape_db=-0.5,
                     wall_db=-47, crinkle_db=-2.5, bump_db=-1.5)
    snaps = knocks(TRAY_SNAPS, ring_s=0.0038, crack_s=0.0022, spread=0.093, broad=0.22, knock_db=-3.5,
                   crack_db=4.5, rebound_s=.004, rebound_db=-8.5)
    snaps += thuds(TRAY_THUDS, TRAY_FLEX, decay_s=0.002, gain_db=3.5)
    creaking = kitchen(creak, wet_db=-1, build_s=.008, near_db=1)
    return creaking + kitchen(snaps, wet_db=-2, build_s=.03, near_db=-5)


def counter(times, thump_db, touches):
    """Blows through the jar ring the counter's modes; the heap adds a hollow rumble."""
    out = struck(COUNTER_MODES, times, thump_db, t60=0.062, scatter_db=2, skew_s=0, detune=0.018)
    rumble = sum(ring(from_db(db) * touches, hz, t60=0.26) for hz, db in COUNTER_MODES)
    out += from_db(-52) * rumble
    out = high_pass(high_pass(out, 135), 110)
    return kitchen(out, wet_db=-2.5, build_s=0.0057)


def ice(times, clack_db, touches):
    """Each landing clacks and cracks ice against ice, and the jostling heap rattles on."""
    out = from_db(-15.5) * tint(touches, JOSTLE_COLOUR)
    for s, clack, jostle in zip(times, clack_db, np.transpose(JAR_HITS)[3]):
        add(out, s, from_db(clack - 6) * peak_one(tint(burst(0.0037), CLACK_COLOUR)))
        add(out, s, from_db(jostle - 22) * peak_one(tint(burst(.005), CRACK_COLOUR)))
    return kitchen(high_pass(out, 90), wet_db=0.5, build_s=0.0085, near_db=3.5)


def glass(times, rings_db, touches):
    """Blows ring five families of glass modes, each with its own decay; the heap keeps them sounding."""
    edges = [0, 4000, 4900, 5200, 6200, SR]  # Hz
    family_t60 = [0.14, 0.16, 0.17, 0.054, 0.059]
    out = np.zeros((2, N))
    for low, high, level_db, t60 in zip(edges, edges[1:], rings_db, family_t60):
        family = [mode for mode in GLASS_MODES if low < mode[0] <= high]
        out += struck(family, times, level_db, t60, scatter_db=1, skew_s=.00004, detune=.0014)
    out += from_db(-2.5) * sum(ring(from_db(db) * touches, hz, t60=0.069) for hz, db in GLASS_MODES)
    return kitchen(band_pass(out, 4, 2300, 11500), wet_db=-7.5, build_s=0.002)


def jar():
    """Falling cubes sound ice, glass and counter; each landing also sets the heap jostling."""
    times, thump_db, clack_db, jostle_db, *rings_db = np.transpose(JAR_HITS)
    heap = np.zeros(N)
    for s, db in zip(times, jostle_db):
        add(heap, s, from_db(db) * np.exp(-TIME[:SR // 4] / 0.045))
    touches = heap * grains(600, 3.7)
    return counter(times, thump_db, touches) + ice(times, clack_db, touches) + glass(times, rings_db, touches)


def scene():
    """Door, freezer, tray and jar over the low hush of the kitchen."""
    return hush() + door() + freezer() + tray() + jar()


def record(dry):
    """Each microphone has its own colour, the left one comes a little late; the top is cut."""
    left = np.pad(tint(dry[0], LEFT_MIC), (LEFT_LAG, 0))[:N]
    right = tint(dry[1], RIGHT_MIC)
    low_pass = signal.ellip(10, .3, 70, CUTOFF_HZ, fs=SR, output="sos")
    return signal.sosfilt(low_pass, np.array([left, right]))


dry = scene()
out = record(dry)
digitize_waveform(out)
```